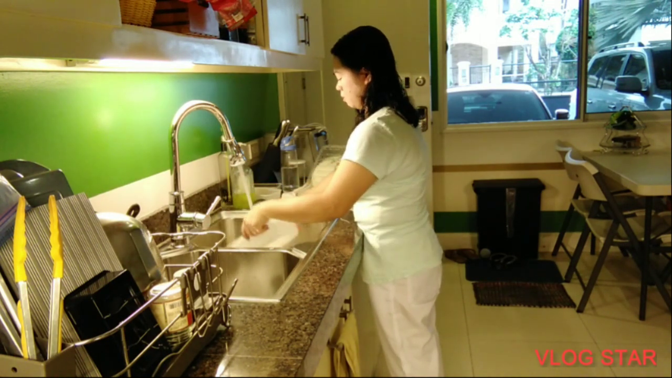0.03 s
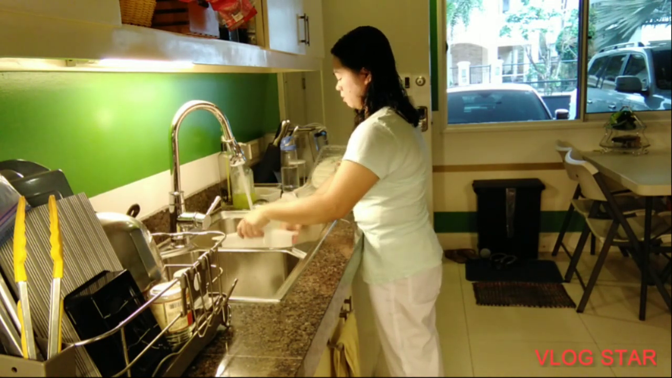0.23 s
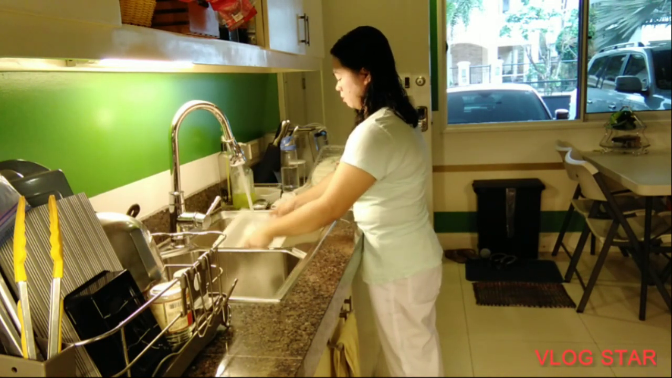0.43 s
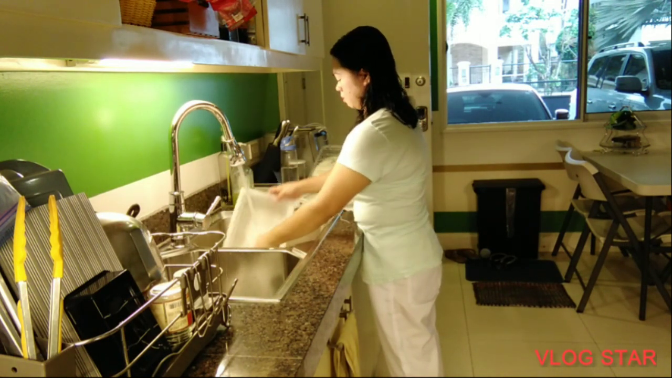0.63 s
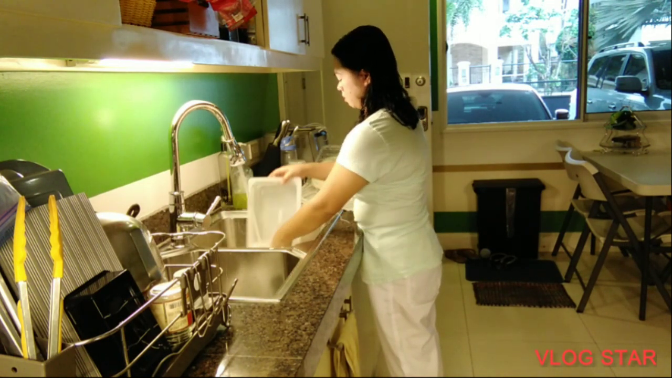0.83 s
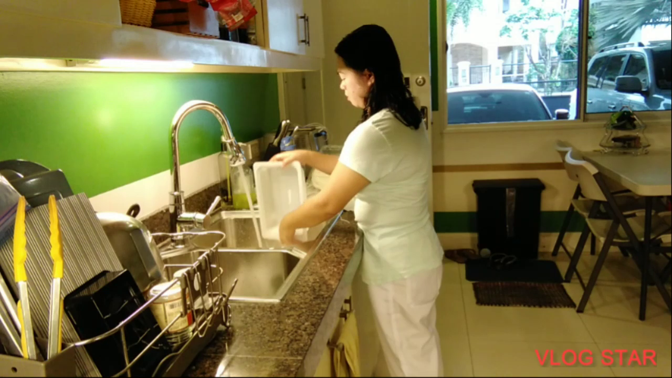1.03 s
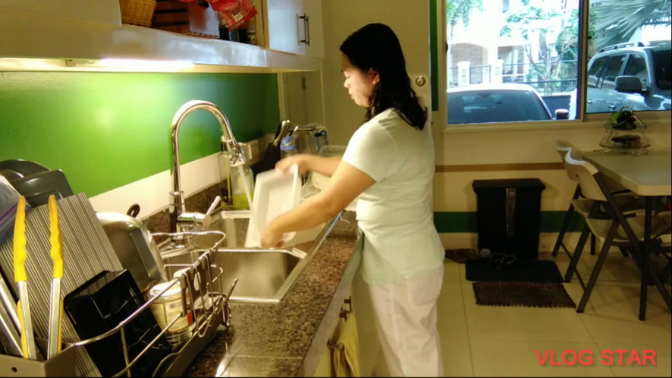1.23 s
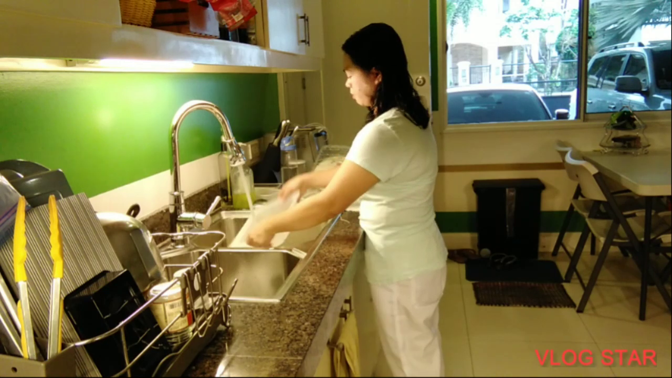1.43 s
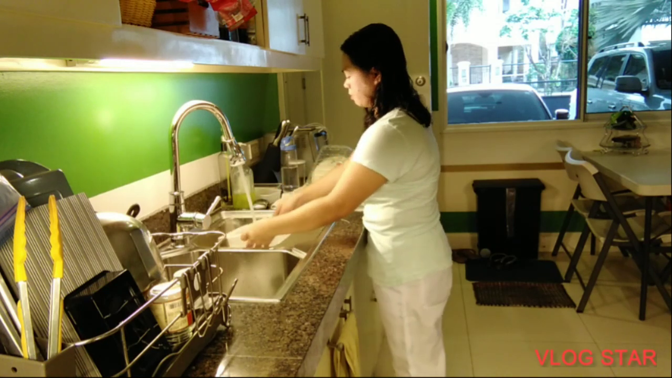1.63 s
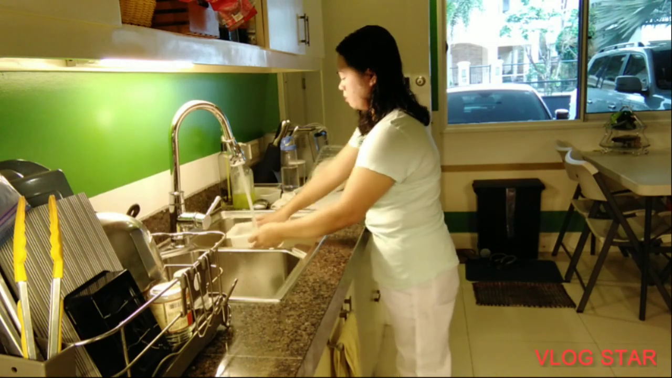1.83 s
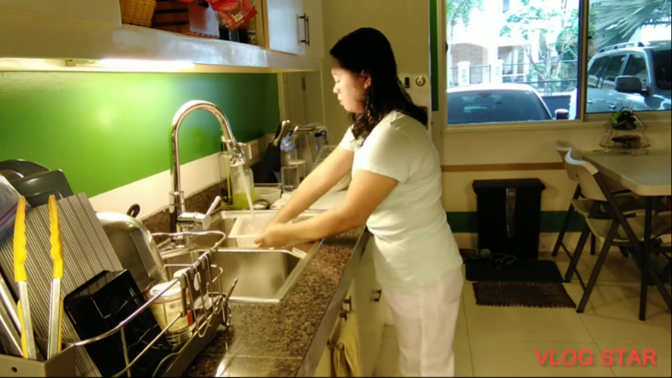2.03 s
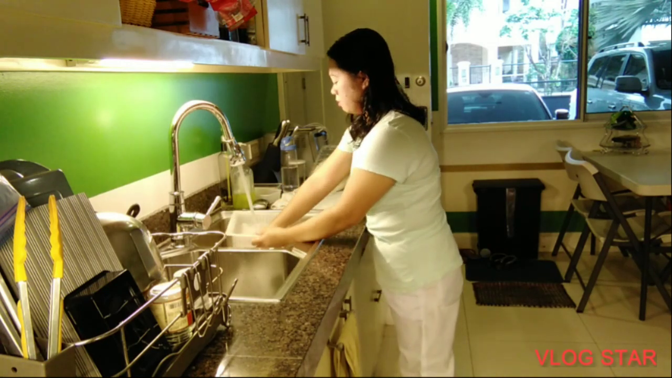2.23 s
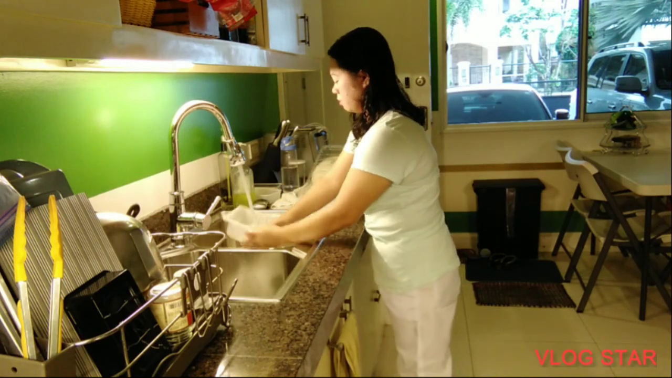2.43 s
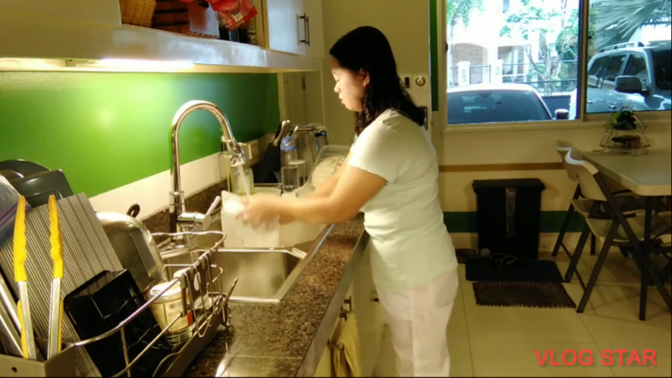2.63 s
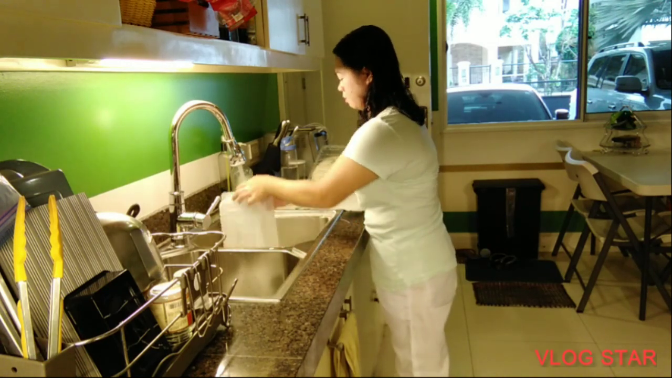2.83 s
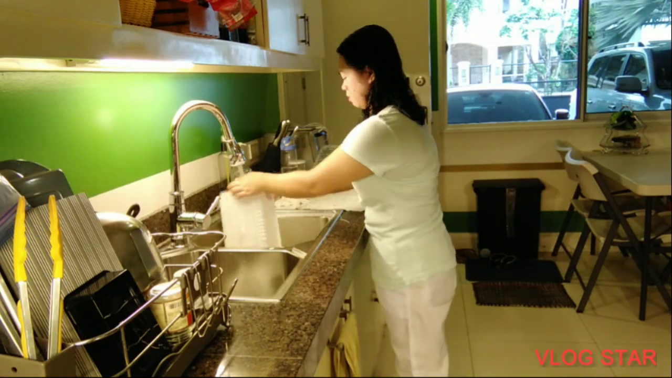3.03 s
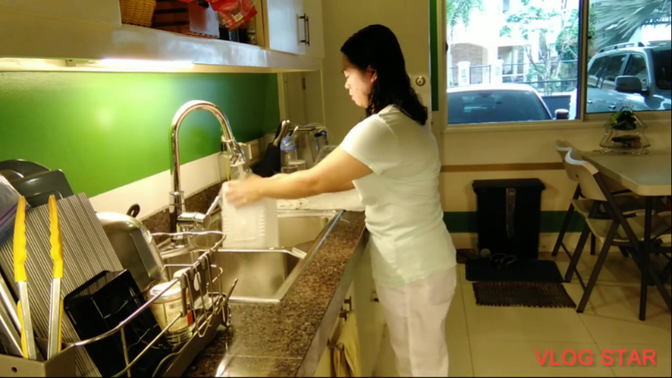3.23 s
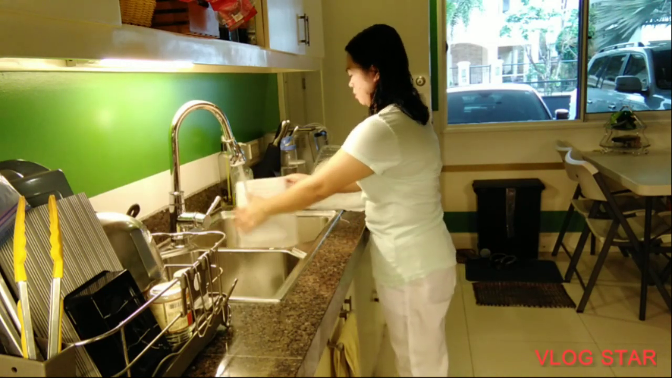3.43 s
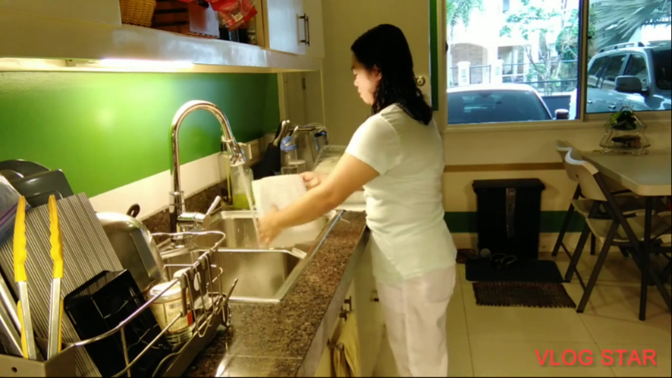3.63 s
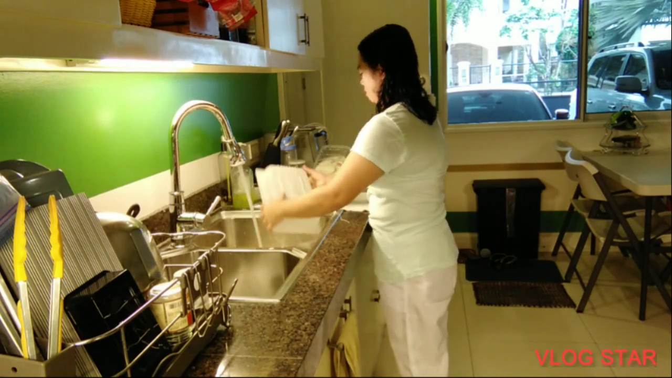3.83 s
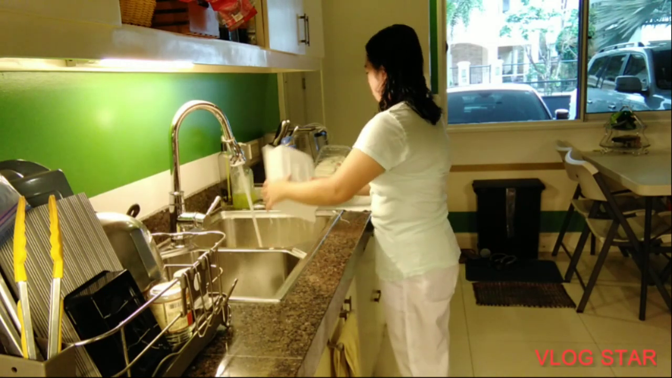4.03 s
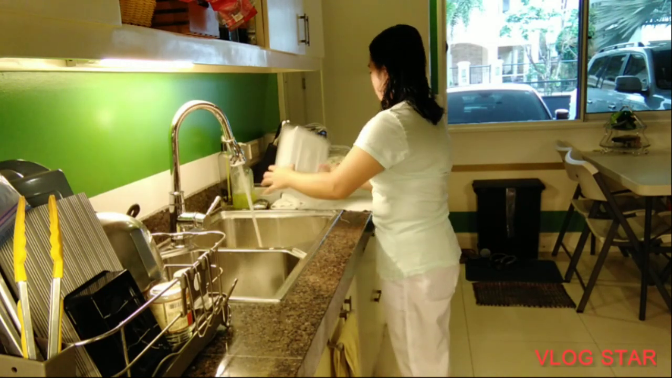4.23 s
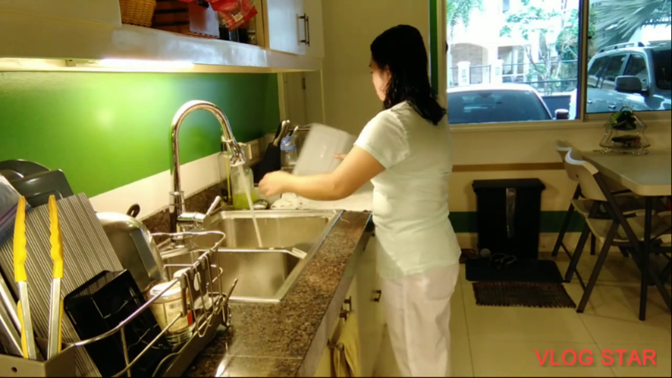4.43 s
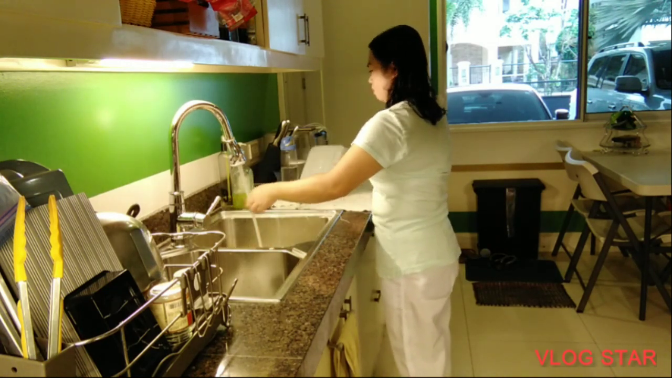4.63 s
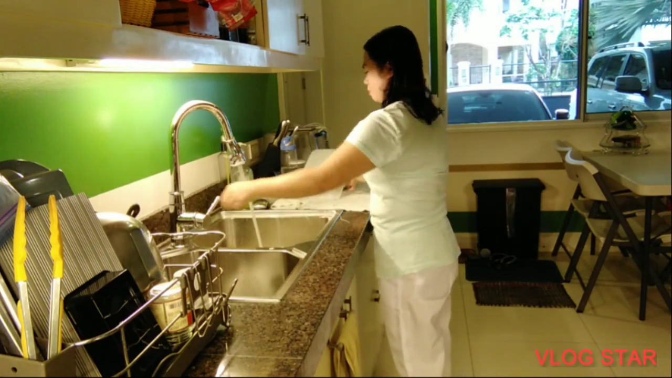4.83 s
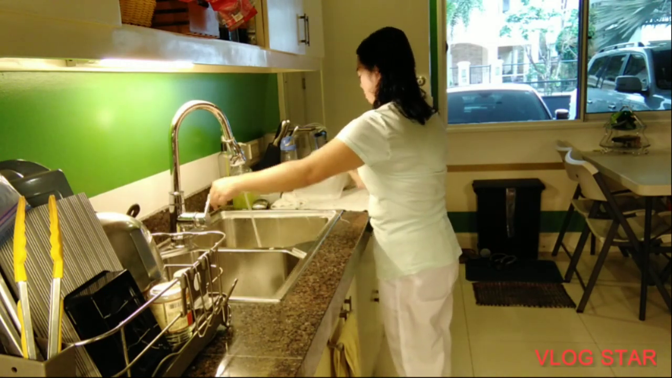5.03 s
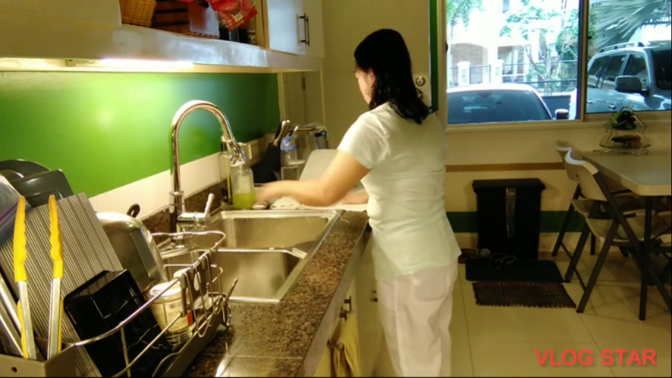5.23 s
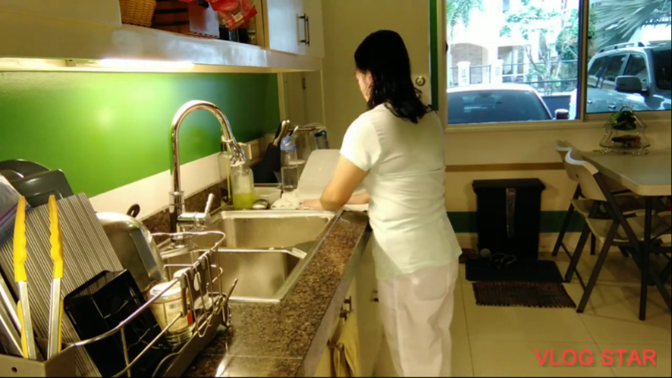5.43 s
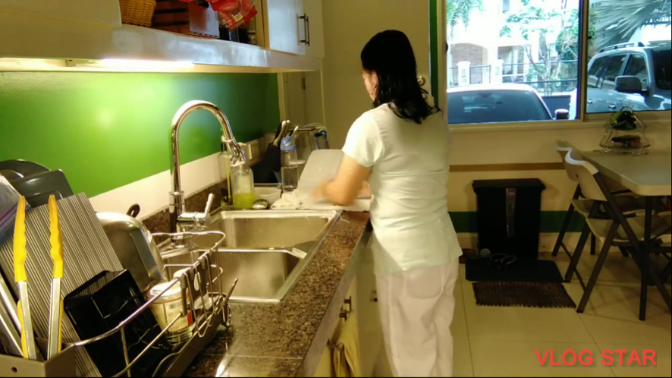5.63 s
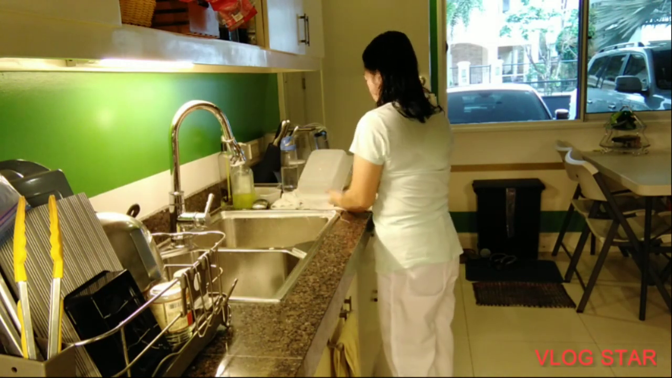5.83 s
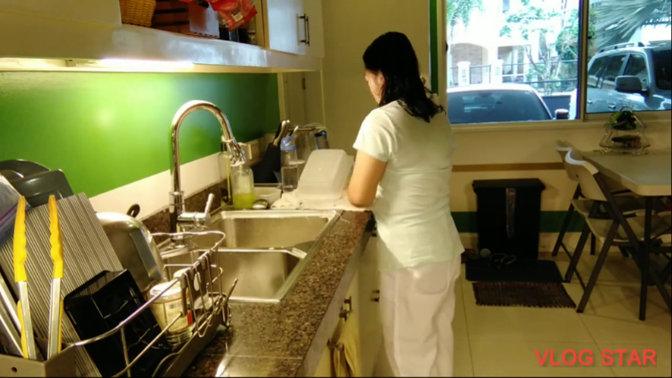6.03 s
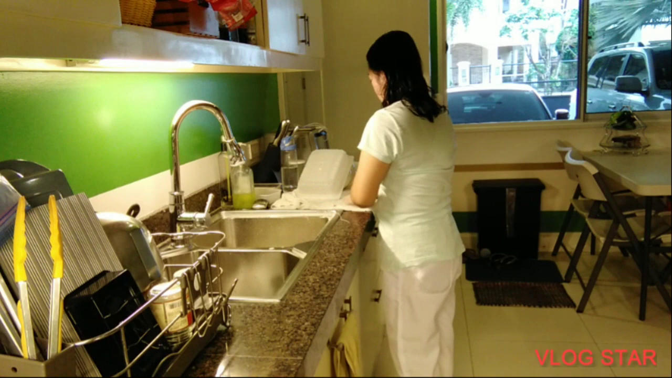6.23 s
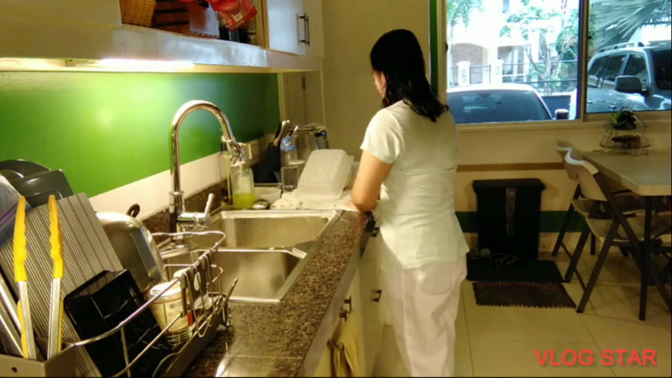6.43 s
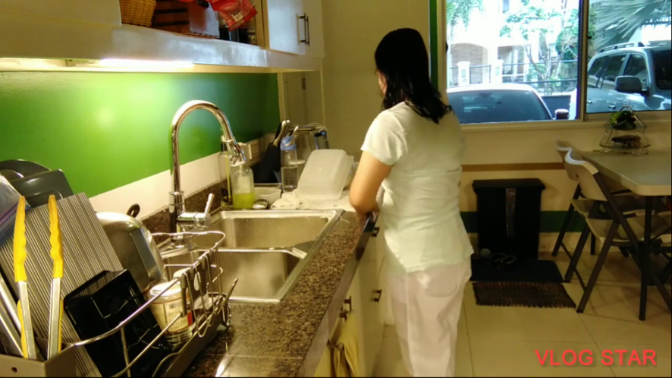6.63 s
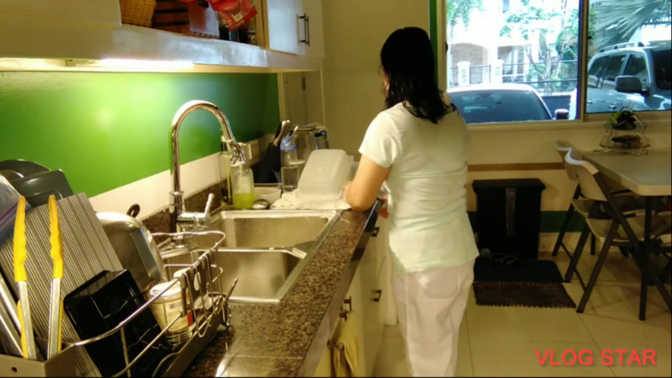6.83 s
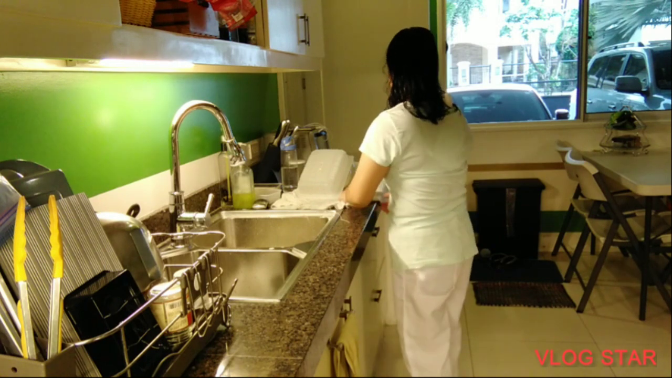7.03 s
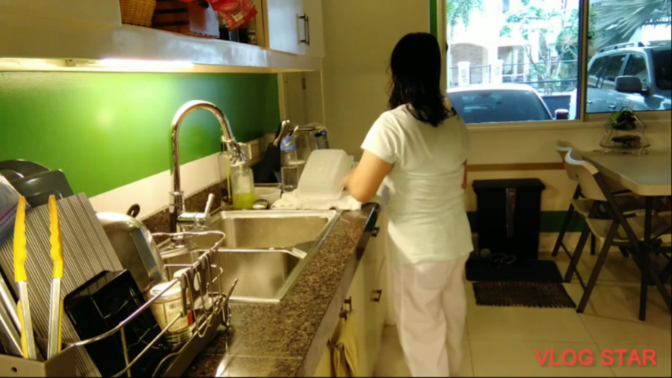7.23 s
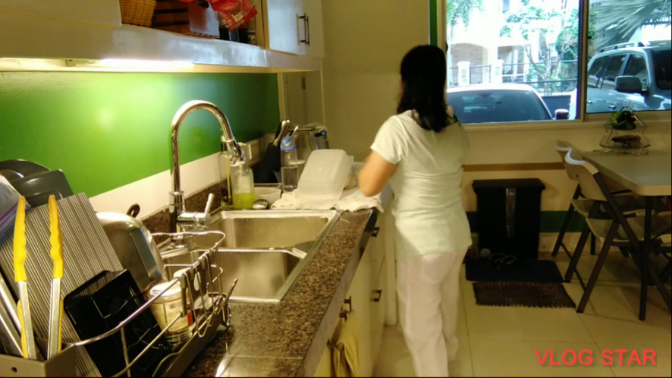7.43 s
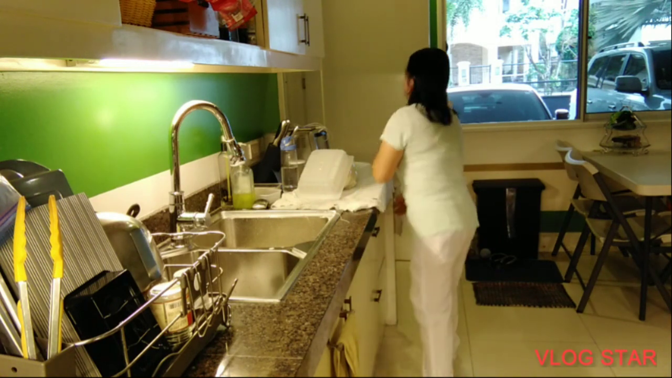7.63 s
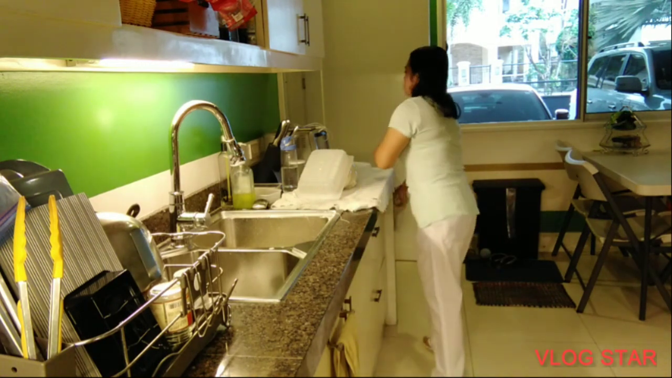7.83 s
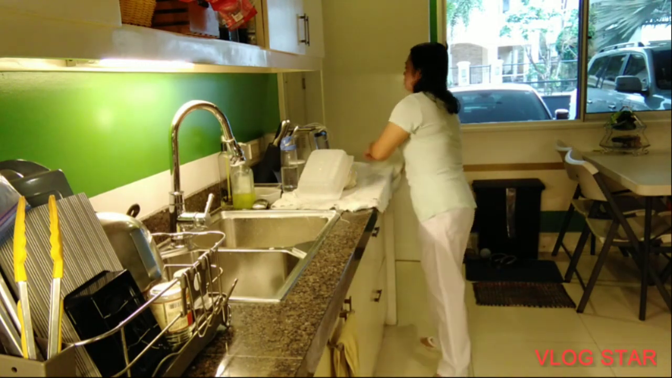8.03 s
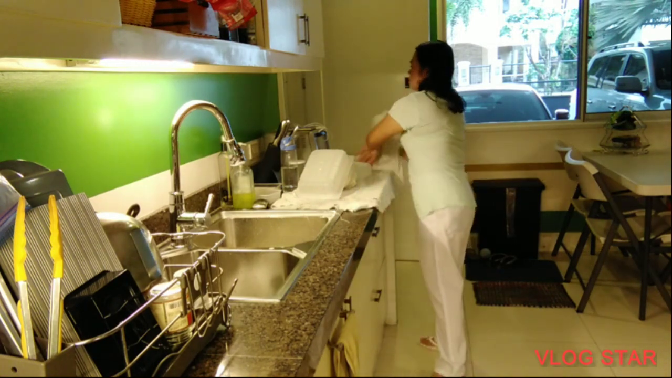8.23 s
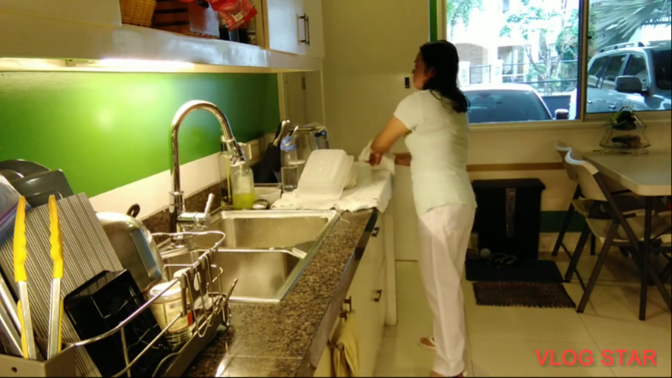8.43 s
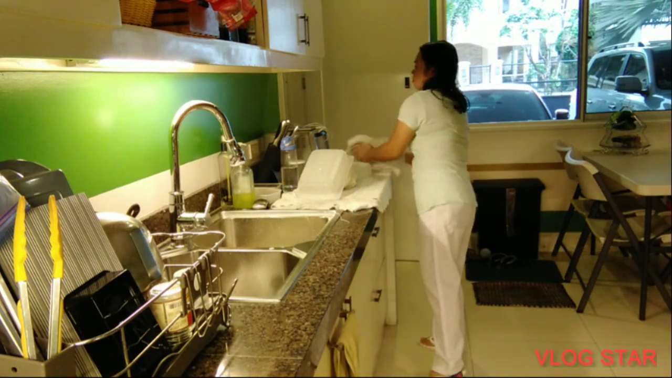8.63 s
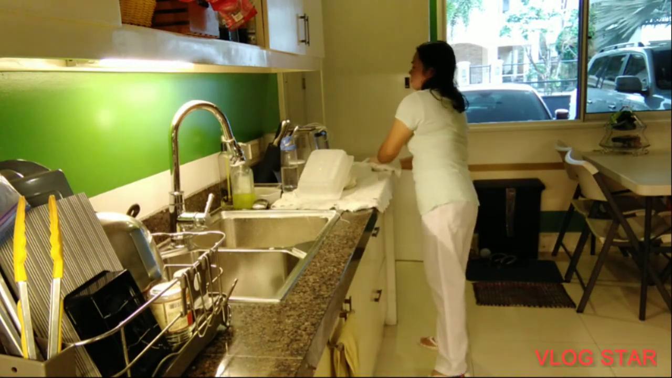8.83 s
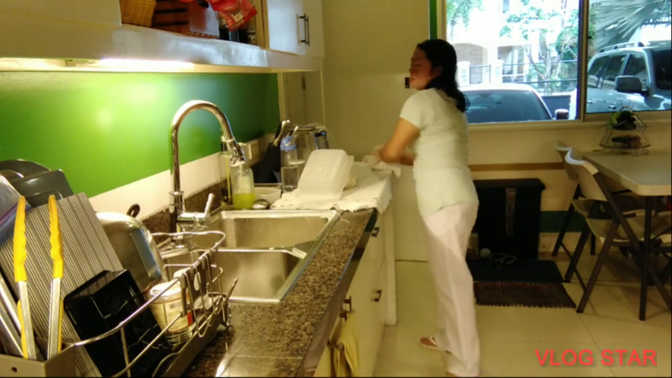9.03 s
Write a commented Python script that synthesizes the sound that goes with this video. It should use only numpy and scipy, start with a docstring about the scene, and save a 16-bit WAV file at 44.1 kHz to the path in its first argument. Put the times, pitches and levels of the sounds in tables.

```python
"""Kitchen tap, sink and tub

A tap sprays into a steel sink while a plastic tub is turned and knocked about: impact noise and bubbles.
The tap shuts, a cupboard door takes five blows (decaying modes, coloured noise) and wobbling sines drip.
Handling rustles and light clatters are filtered noise; some sources get a noise-tail room echo.
Room tone and mains hum lie beneath; both channels are identical."""
import sys
import numpy as np
from scipy import signal
from scipy.fft import rfft, irfft, next_fast_len
from scipy.io import wavfile
from scipy.ndimage import uniform_filter1d

SR = 44100
rng = np.random.default_rng(int(sys.argv[2]) if len(sys.argv) > 2 else 0)


def put_to_file(sound):
    """Save the sound as 16-bit audio at rate SR, in the file named by the first command-line argument."""
    columns = np.atleast_2d(sound).T  # one column per channel
    safe = np.clip(columns, -1, 1)
    whole_steps = np.round(safe * 32767)
    wavfile.write(sys.argv[1], SR, whole_steps.astype(np.int16))


N = 401302
T = np.arange(N) / SR  # s
AGE = T[:SR]  # one second of time since a blow, s

# Room tone colour: (frequency [Hz], level [dB])
AIR_COLOUR = [(30, -31), (50, 4.5), (90, -3.5), (150, -10.5), (205, 4), (260, -9), (360, -6), (540, -16.5),
              (950, -7), (1300, -12), (3900, -21.5), (6700, -21.5), (8130, -13.5), (9800, -25),
              (15500, -41)]
# Mains hum lines: (frequency [Hz], rms level [dB])
HUM_LINES = [(59.3, -77.5), (120, -84.5)]
# Handling at the counter: (time of height [s], level [dB], build-up [s], ebb [s])
RUSTLE_SPELLS = [(5.5, -77, 0.11, 0.28), (6.75, -75, 0.43, 0.45), (7.67, -64.5, 0.074, 0.089),
                 (8.05, -74, 0.3, 0.18)]
# Handling colour: (frequency [Hz], level [dB])
RUSTLE_COLOUR = [(1000, -5.5), (1600, -4), (1900, 4), (2500, -2), (2900, 7), (3900, -22), (5000, -4),
                 (7000, -15), (12000, -31), (16000, -33)]
# Crockery rings: (frequency [Hz], level [dB], t60 [s])
CROCKERY_MODES = [(1316, -19, 0.15), (1836, 0.5, 0.55), (2170, -10, .35), (2864, -3, 0.83),
                  (4570, -10.5, 0.7), (6550, -11, 0.34)]
# Short clatters and splats: (time [s], level [dB], centre [Hz], width [octaves])
CLATTER_EVENTS = [(1.0, -36, 4800, .5), (1.06, -33, 7540, 0.36), (1.25, -35.5, 7040, 0.48),
                  (2.944, -31.5, 4710, 0.89), (3.652, -42, 6000, .6), (5.399, -43.5, 6900, 0.34),
                  (5.501, -50.5, 5550, .5), (6.864, -52, 2010, 0.44), (7.368, -68, 5500, 0.64),
                  (7.593, -50.5, 9800, 0.11), (7.647, -47.5, 4570, 0.44), (7.658, -49.5, 2300, 0.2),
                  (7.67, -55, 4200, 0.45), (7.807, -58, 3400, .35), (7.9197, -57, 2720, 0.17)]
# Clear drips, two partials: (time [s], level [dB], low [Hz], high [Hz], high relative to low [dB])
DRIP_EVENTS = [(5.429, -47, 2990, 7900, -2), (5.4987, -67.5, 3400, 4700, 18.5),
               (5.516, -54, 1775, 6600, -7), (5.7285, -43.5, 2497, 4950, -21),
               (5.8093, -49, 2520, 4940, -12), (5.9263, -74.5, 2940, 6670, 26),
               (6.213, -68, 2840, 6400, 19.5), (6.548, -52, 2640, 5200, -25),
               (6.735, -58, 2530, 7920, 14.5), (6.862, -44, 1900, 4470, -28),
               (6.893, -49.5, 2650, 4730, -8), (6.997, -56.5, 2870, 7670, 1), (7.202, -60, 2900, 4980, 4),
               (7.3677, -63, 3460, 6420, 7), (7.5532, -52.5, 2370, 7070, -25),
               (7.5923, -51.5, 3400, 7670, 5), (7.67, -44, 2240, 8340, -2.5),
               (7.807, -52.5, 3420, 8490, -6), (7.878, -48, 1990, 9000, -13),
               (7.9188, -54.5, 2570, 4430, -5), (8.033, -63, 2760, 6150, 9), (8.11, -57, 2630, 4430, -4),
               (8.268, -57, 1830, 4960, 9), (8.757, -60, 2640, 7960, 3), (8.9, -69.5, 1870, 6030, 14.5),
               (9.076, -57, 3460, 7750, -9)]
# Cupboard door blows: (time [s], boom level [dB], boom centre [Hz], panel level [dB],
# latch clack level [dB], dull above [Hz])
DOOR_BLOWS = [(5.606, -40, 119, -49.5, -44.5, 9100), (5.971, -41.5, 170, -39, -51, 5600),
              (6.25, -35, 162, -44.5, -41, 9000), (6.30, -59, 200, -51, -46, 6500),
              (6.524, -30, 121, -45.5, -71, 3200)]
# Door modes: (frequency [Hz], level [dB], t60 [s])
DOOR_MODES = [(93.1, -7.5, 0.58), (121, 2, 0.31), (147, -5, 0.52), (170.5, -0.5, 0.47), (201, -1.5, 0.49)]
# Door panel colour: (frequency [Hz], level [dB])
PANEL_COLOUR = [(180, -2.5), (285, -8.5), (365, 2), (450, -2.5), (530, -1), (620, -6), (790, -21),
                (1000, -23), (2000, -52)]
# Latch clack colour: (frequency [Hz], level [dB])
CLACK_COLOUR = [(500, 1), (780, 10), (1000, -14), (1250, 6.5), (1550, -2.5), (1900, 0.5), (2300, 0),
                (2750, 0.5), (3500, -0.5), (4500, -0.5), (5800, -6.5), (7000, -3.5), (9000, -10.5),
                (16000, -27)]
# Tub bumping the basin: (time [s], level [dB])
BASIN_BUMPS = [(0.17, -52.5), (0.569, -52), (1.024, -44.5), (1.399, -45), (1.582, -49), (1.835, -44.5),
               (2.418, -51), (2.664, -47), (3.194, -46), (3.871, -54.5), (4.091, -52), (4.932, -39.5),
               (5.009, -36.5), (5.081, -37), (5.171, -43.5)]
# Basin modes: (nominal frequency [Hz], level [dB], t60 [s])
BASIN_MODES = [(117.6, -12.5, 0.23), (175.2, -8.5, 0.33), (202.2, 1.5, 0.21), (236.7, -6.5, 0.3)]
# Tub and tap knocking the sink: (time [s], level [dB], dull above [Hz], t60 [s])
SINK_KNOCKS = [(2.892, -39.5, 740, 0.42), (2.935, -43.5, 794, 0.26), (4.255, -61.5, 796, 0.28),
               (4.777, -43.5, 1466, 0.41), (4.899, -31, 2300, 0.43), (4.93, -34, 3020, 0.4),
               (5.0, -37, 1600, 0.25), (5.071, -45.5, 1380, 0.24)]
# Hollow knock colour: (frequency [Hz], level [dB])
KNOCK_COLOUR = [(200, -30), (290, -23), (360, 3.5), (440, -2.5), (540, 5), (650, 1), (820, 4), (1000, -5.5),
                (1200, 4.5), (1520, -11), (1850, 3.5), (2300, -13), (5000, 12)]
# Stream, loud breaking on the tub, soft sliding along a wall: (time [s], relative spray level [dB])
TAP_LEVEL = [(0.0, -33.5), (0.03, -36.5), (0.48, -40), (0.53, -36.5), (0.93, -41.5), (1.4, -33.5),
             (1.48, -40.5), (1.55, -35.5), (2.62, -37.5), (2.75, -41.5), (2.94, -35), (3.2, -37),
             (3.36, -45), (3.63, -45), (3.66, -39.5), (3.82, -40), (3.92, -35.5), (5.2, -33.5)]
# Spray colour: (frequency [Hz], level [dB])
SPRAY_COLOUR = [(1500, -42), (2500, -16.5), (4000, -9.5), (5500, -9), (6800, -7), (7600, -3), (8300, -0.5),
                (9200, -7), (10500, -13), (12500, -20), (14500, -30.5), (16000, -30)]
# Splash colour: (frequency [Hz], level [dB])
SPLASH_COLOUR = [(900, -60), (1550, -24.5), (1850, -6), (2150, -3), (2800, -0.5), (3600, 0), (4600, 1.5),
                 (6000, -6), (9000, -21)]
# Colour of the basin drummed by water: (frequency [Hz], level [dB])
DRUM_COLOUR = [(130, -14), (200, -3), (290, 2.5), (400, -9), (520, 4), (650, -1.5), (800, 2), (980, -17.5),
               (1400, -14)]
# Tub gurgle colour: (frequency [Hz], level [dB])
GURGLE_COLOUR = [(700, -55), (1000, -11), (1150, -10.5), (1450, -18.5), (1700, 8.5), (2300, -30)]
# Water running off the tub onto the basin: (time of height [s], level [dB], build-up [s], ebb [s])
POUR_SPELLS = [(0.02, -54, .1, 0.24), (.8, -55.5, 0.31, 0.26), (1.64, -55, 0.16, .1),
               (1.97, -49, 0.16, 0.22), (2.52, -44, 0.15, 0.16), (3.03, -57, 0.1, 0.23),
               (4.28, -63, 0.028, .15)]
# Air glugging in the upturned tub: (time of height [s], level [dB], build-up [s], ebb [s])
GLUG_SPELLS = [(.57, -54, .03, 0.044), (1.14, -45.5, .07, 0.12), (1.9, -59, 0.05, 0.13),
               (2.95, -50, .05, 0.072), (3.6, -60, 0.03, 0.1)]
# Collected water spilling and splashing: (time of height [s], level [dB], build-up [s], ebb [s])
SPILL_SPELLS = [(.56, -43.5, 0.026, .03), (1.13, -42, 0.14, 0.26), (2.52, -41.5, .03, 0.054),
                (3.02, -44.5, 0.16, 0.54), (3.65, -43.5, 0.12, 0.1), (4.08, -43.5, 0.098, 0.18),
                (4.94, -38.5, 0.084, 0.15), (5.27, -39, .03, 0.13)]

AIR_DB, TOP_HZ = -68.5, 15730
RUSTLE_RING_DB = -1.5  # crockery relative to crackle
DRAIN_S, DRAIN_DB_PER_S = 7.23, 2  # faint dripping dies down from here
NUDGE_DB, NUDGE_SPREAD_DB = -60, 1.5
SPRAY_DB = 1.0  # added to TAP_LEVEL
SPLASH_DB, SPLASH_DB_PER_SPRAY_DB = -44, 0.42  # level at the mean spray level; slope
CLOSE_S, CLOSE_DB_PER_S, SHUT_S, SEAT_S = 5.192, 53, 5.5, 0.051  # turned down, then the valve seats
TRICKLE_DB = -70  # steady drumming under the pours
GURGLE_DB, GURGLE_WANDER_DB = -65, 6  # steady gurgling


def amp(db):
    """Decibels to gain."""
    return 10 ** (np.asarray(db) / 20)


def unit(x):
    """Scale to rms 1."""
    return x / np.sqrt(np.mean(x ** 2))


def shaped(x, gain):
    """Filter by a gain that is a function of Hz; rms 1."""
    size = next_fast_len(len(x))
    hz = np.maximum(np.fft.rfftfreq(size, 1 / SR), 1)
    return unit(irfft(rfft(x, size) * gain(hz), size)[:len(x)])


def colour(x, points):
    """Filter by a spectrum of (frequency [Hz], level [dB]) points; rms 1."""
    f_hz, db = np.transpose(points)
    return shaped(x, lambda hz: amp(np.interp(np.log(hz), np.log(f_hz), db)))


def add(out, s, sound):
    """Mix a sound in at a time in seconds."""
    start = max(int(s * SR), 0)
    out[start:start + len(sound)] += sound[:N - start]


def fade(t60):
    """Exponential decay, 60 dB in t60 seconds."""
    return np.exp(-np.log(1000) * AGE / t60)


def swell(rise_s, hold_s, t60):
    """Blow envelope: reflections build up, hold briefly, then die away; peak 1."""
    decay = np.minimum(1, fade(t60) * np.exp(np.log(1000) * hold_s / t60))
    shape = (1 - np.exp(-AGE / rise_s)) * decay
    return shape / shape.max()


def spells(rows):
    """Summed-power gain of gestures that build up and ebb: (time [s], level [dB], build-up [s], ebb [s])."""
    power = np.zeros(N)
    for s, db, build_s, ebb_s in rows:
        reach_s = np.where(T < s, build_s, ebb_s)
        power += amp(db) ** 2 * np.exp(-2 * ((T - s) / reach_s) ** 2)
    return np.sqrt(power)


def walk(per_s):
    """Random wandering: straight lines between unit-spread random knots."""
    knots = rng.standard_normal(int(per_s * N / SR) + 3)
    return np.interp(T * per_s, np.arange(len(knots)), knots)


def room(x, wet_db, t60):
    """Direct sound plus the dense noise-like echoes of a hard room."""
    echo = rng.standard_normal(SR) * fade(t60) * (1 - np.exp(-AGE / 0.00073))
    echo *= amp(wet_db) / np.sqrt(np.sum(echo ** 2))
    echo[0] += 1  # direct sound
    return signal.fftconvolve(x, echo)[:N]


def wash(x, wet_db, t60):
    """Impacts land all over: a diffuse noise tail follows their energy."""
    tail = fade(t60) ** 2
    energy = np.abs(signal.fftconvolve(x ** 2, tail / tail.sum())[:N])
    return x + amp(wet_db) * np.sqrt(energy) * rng.standard_normal(N)


def impacts(per_s, spread_db):
    """Random clicks of either sign; a positive spread makes a few far bigger, a negative one smaller."""
    size = amp(spread_db * np.minimum(rng.exponential(size=N), 5))
    return (rng.random(N) < per_s / SR) * size * rng.choice([-1, 1], N)


def bubbles(low_hz, high_hz, cycles, glide, spread_db, count):
    """Bubbles as decaying sines that rise in pitch as they near the surface; rms 1."""
    out = np.zeros(N)
    for when, pitch, big in rng.random((count, 3)):
        hz = low_hz * (high_hz / low_hz) ** pitch
        t = T[:int(3 * cycles / hz * SR)]
        life = t * hz / cycles
        ring = np.sin(2 * np.pi * hz * t * (1 + glide * life)) * np.exp(-2 * life)
        # spread_db sign as in impacts
        add(out, when * N / SR, ring * amp(-spread_db * np.log(max(big, .02))))
    return unit(out)


def plink(hz, width_hz):
    """Sine whose pitch wobbles at random, by width_hz rms."""
    wobble = unit(uniform_filter1d(rng.standard_normal(SR), size=80))
    return np.sin(2 * np.pi * np.cumsum(hz + width_hz * wobble) / SR)


def struck(points, dull_hz, cluster_hz):
    """Crowded modes as noise bunched in frequency; softer contact leaves out the highs."""
    grid_hz = np.cumsum(cluster_hz * rng.uniform(.5, 1.5, size=800))
    bunches_db = 6 * np.sin(2 * np.pi * rng.random(len(grid_hz)))
    ring = colour(rng.standard_normal(SR), points)

    def gain(hz):
        return amp(np.interp(hz, grid_hz, bunches_db)) / np.sqrt(1 + (hz / dull_hz) ** 8)

    return shaped(ring, gain)


def rattle():
    """Loose parts chatter: the level wanders every few milliseconds."""
    level_db = 1.8 * np.interp(AGE, np.linspace(0, 1, 220), rng.standard_normal(220))
    return unit(amp(level_db))


def boom(modes, rise_s, hold_s):
    """Low modes, slightly detuned at every blow; loudest moment near rms 1."""
    ring = np.zeros(SR)
    for nominal_hz, db, t60 in modes:
        hz = nominal_hz * (1 + 0.0232 * rng.standard_normal())
        tone = np.sin(2 * np.pi * hz * AGE + rng.uniform(0, 2 * np.pi))
        ring += amp(db) * tone * swell(rise_s, hold_s, t60)
    return ring / np.sqrt(sum(amp(db) ** 2 for _, db, _ in modes) / 2)


def wander(x, depth_db, per_s):
    """As the tub turns under the stream, two bands swell and sink on their own."""
    low_sos = signal.butter(2, 2400, fs=SR, output="sos")
    mid_sos = signal.butter(1, [3000, 4200], "band", fs=SR, output="sos")
    parts = [signal.sosfilt(sos, x) for sos in (low_sos, mid_sos)]
    for part in parts:
        x = x + part * (amp(depth_db * walk(per_s)) - 1)
    return unit(x)


def hollow(x, depth_db, spacing_hz, turns_per_s):
    """Tub-to-basin echoes as two random frequency ripples, cross-mixed as the tub is turned."""
    out = np.zeros(N)
    grid_hz = np.arange(400) * spacing_hz
    pose = walk(per_s=turns_per_s) * np.pi / 2
    for weight in (np.cos(pose), np.sin(pose)):
        teeth = rng.standard_normal(len(grid_hz))
        out += weight * shaped(x, lambda hz: np.interp(hz, grid_hz, teeth))
    return unit(x + amp(depth_db) * out)


def room_tone():
    """Still air as coloured noise, and faint mains hum as sines."""
    hum = sum(np.sqrt(2) * amp(db) * np.sin(2 * np.pi * hz * T) for hz, db in HUM_LINES)
    return colour(rng.standard_normal(N), AIR_COLOUR) * amp(AIR_DB) + hum


def rustle():
    """Hands and cloth brush over things: a thin crackle, with crockery rings at random moments."""
    grains = wash(impacts(per_s=400, spread_db=2.5), wet_db=1, t60=0.15)
    rings = np.zeros(N)
    for hz, db, t60 in CROCKERY_MODES:
        hits = impacts(per_s=54, spread_db=2)
        ring = plink(hz, width_hz=105) * fade(t60)
        rings += amp(db) * signal.fftconvolve(hits, ring)[:N]
    crackle = colour(grains, RUSTLE_COLOUR)
    ringing = amp(RUSTLE_RING_DB) * colour(rings, RUSTLE_COLOUR)
    return (crackle + ringing) * spells(RUSTLE_SPELLS)


def clatters():
    """Rattles of light, hard things and slaps of water: short noise bands."""
    out = np.zeros(N)
    for s, db, centre_hz, octaves in CLATTER_EVENTS:
        burst = shaped(rng.standard_normal(SR),
                       lambda hz: np.exp(-(np.log2(hz / centre_hz) / octaves) ** 2 / 2))
        # lower rings take longer to speak
        add(out, s, amp(db) * burst * swell(rise_s=6 / centre_hz, hold_s=0.0014, t60=0.045))
    return room(out, wet_db=-2, t60=.34)


def drips():
    """Drops plink in the wet sink as two wobbling partials and a splat; faint bubbles throughout."""
    out = np.zeros(N)
    slow = swell(rise_s=.005, hold_s=.007, t60=.035)
    quick = swell(rise_s=0.002, hold_s=0.0014, t60=0.025)
    splat = colour(rng.standard_normal(SR), SPLASH_COLOUR) * quick
    for s, db, low_hz, high_hz, high_db in DRIP_EVENTS:
        low = plink(low_hz, width_hz=68) * slow
        high = plink(high_hz, width_hz=184) * quick
        add(out, s, amp(db - 1.0) * (low + amp(high_db) * (high + amp(-19) * splat)))
    # faint dripping gets quieter as the sink drains
    draining = amp(-DRAIN_DB_PER_S * np.maximum(T - DRAIN_S, 0))
    faint_low = bubbles(1774, 3070, cycles=40, glide=0.0037, spread_db=5.0, count=300)
    faint_high = bubbles(3494, 12000, cycles=46, glide=0.0033, spread_db=3, count=300)
    faint = (amp(-73.5) * faint_low + amp(-75.5) * faint_high) * draining
    return room(out + faint, wet_db=-1, t60=.34)


def door():
    """Each blow: the latch clacks first, panel and crockery answer, the low boom builds up last."""
    out = np.zeros(N)
    for s, boom_db, centre_hz, panel_db, clack_db, dull_hz in DOOR_BLOWS:
        # where the door is struck decides which modes speak
        modes = [(hz, db - 12 * abs(np.log2(hz / centre_hz)), t60) for hz, db, t60 in DOOR_MODES]
        low = amp(boom_db) * boom(modes, rise_s=0.027, hold_s=0.046)
        panel = amp(panel_db) * struck(PANEL_COLOUR, dull_hz, cluster_hz=35.95)
        panel *= swell(rise_s=0.0037, hold_s=0.055, t60=0.35)
        clack = amp(clack_db - 0.5) * struck(CLACK_COLOUR, dull_hz, cluster_hz=170.0)
        clack *= swell(rise_s=0.0011, hold_s=0.05, t60=0.3)
        rings = sum(amp(db) * plink(hz, width_hz=80.3) * swell(rise_s=0.007, hold_s=0.019, t60=t60)
                    for hz, db, t60 in CROCKERY_MODES)
        # the jolt of the whole counter shakes the crockery
        rings *= amp((boom_db + clack_db) / 2 - 14.5)
        add(out, s, low + (panel + clack) * rattle() + rings)
    return out


def nudges(count):
    """The tub grazes the basin at uneven intervals until the tap starts to close."""
    out = np.zeros(N)
    for k in range(count):
        s = (k + rng.random()) / count * CLOSE_S
        db = NUDGE_DB + NUDGE_SPREAD_DB * rng.standard_normal()
        add(out, s, amp(db) * boom(BASIN_MODES, rise_s=0.0035, hold_s=0.016))
    return out


def sink():
    """Soft bumps boom the basin's low modes; harder knocks ring its crowded upper modes."""
    out = np.zeros(N)
    for s, db in BASIN_BUMPS:
        add(out, s, amp(db - 4.5) * boom(BASIN_MODES, rise_s=0.0013, hold_s=0.013))
    for s, db, dull_hz, t60 in SINK_KNOCKS:
        ring = struck(KNOCK_COLOUR, dull_hz, cluster_hz=49.7) * rattle()
        add(out, s, amp(db) * ring * swell(rise_s=0.0069, hold_s=0.044, t60=t60))
    return out


def spray(strike_db):
    """Aerated stream fizz: dense fine impacts and high bubbles."""
    fizz = unit(impacts(per_s=5000, spread_db=0.5))
    fizz += amp(-10.5) * bubbles(4940, 11440, cycles=45, glide=0.016, spread_db=2.0, count=2500)
    fizz = colour(wash(fizz, wet_db=2, t60=.3), SPRAY_COLOUR)
    fizz = hollow(fizz, depth_db=-15, spacing_hz=130.1, turns_per_s=1.5)
    return fizz * amp(strike_db + SPRAY_DB + 0.58 * walk(per_s=16))


def splash(strike_db, closing):
    """Bigger drops and their bubbles follow the stream level, with harder spills."""
    drops = unit(impacts(per_s=2200, spread_db=-4.0))
    drops += amp(-6.5) * bubbles(1719.4, 5546, cycles=66, glide=0.0258, spread_db=1.5, count=2800)
    drops = colour(wash(drops, wet_db=1, t60=.35), SPLASH_COLOUR)
    drops = wander(drops, depth_db=0.5, per_s=11)
    drops = hollow(drops, depth_db=-11, spacing_hz=109.9, turns_per_s=2.01)
    # big drops go first as the tap closes: crossfade to the band above 2500 Hz
    fine = shaped(drops, lambda hz: 1 / (1 + (2500 / hz) ** 12))
    mix = (1 - closing) * drops + closing * fine
    level_db = SPLASH_DB + SPLASH_DB_PER_SPRAY_DB * (strike_db - strike_db[T < CLOSE_S].mean())
    return mix * np.hypot(amp(level_db), spells(SPILL_SPELLS))


def drum():
    """Water running off the tub patters on the steel: impacts and low bubbles through basin colour."""
    patter = unit(impacts(per_s=900, spread_db=1.5))
    patter += .6 * bubbles(420, 900, cycles=22, glide=.03, spread_db=2, count=700)
    drumming = colour(room(patter, wet_db=2.0, t60=0.38), DRUM_COLOUR)
    return drumming * (spells(POUR_SPELLS) + amp(TRICKLE_DB))


def gurgle():
    """Air glugs in the tub as bubbles, over a steady gurgling of wandering level."""
    glugs = bubbles(917, 2033, cycles=32.2, glide=0.036, spread_db=-1.5, count=1300)
    glugs = colour(room(glugs, wet_db=-1.0, t60=0.14), GURGLE_COLOUR)
    steady = amp(GURGLE_DB + GURGLE_WANDER_DB * walk(per_s=9))
    return glugs * (spells(GLUG_SPELLS) + steady)


def water():
    """The stream sprays, splashes, drums and gurgles until the closing valve cuts the flow."""
    strike_db = np.interp(T, *np.transpose(TAP_LEVEL))
    turned_down = amp(-CLOSE_DB_PER_S * np.maximum(T - CLOSE_S, 0))
    flow = turned_down * np.clip((SHUT_S - T) / SEAT_S, 0, 1)
    closing = np.clip((T - 5.17) / 0.17, 0, 1)
    in_tub = (1 - closing) * (drum() + gurgle())
    return flow * (spray(strike_db) + splash(strike_db, closing) + in_tub)


def scene():
    """Sum of all sources, the same in both channels."""
    background = room_tone() + rustle() + clatters() + drips()
    mono = background + door() + nudges(count=12) + sink() + water()
    return np.array([mono, mono])


def record(dry):
    """Thin the deep bass below 48 Hz and cut steeply above TOP_HZ."""
    thin = signal.sosfilt(signal.butter(4, 48, "high", fs=SR, output="sos"), dry)
    return signal.sosfilt(signal.ellip(12, .1, 80, TOP_HZ, fs=SR, output="sos"), thin)


dry = scene()
out = record(dry)
put_to_file(out)
```